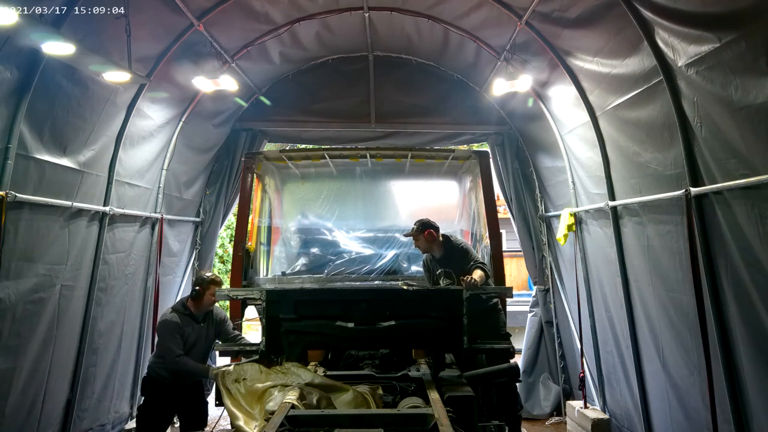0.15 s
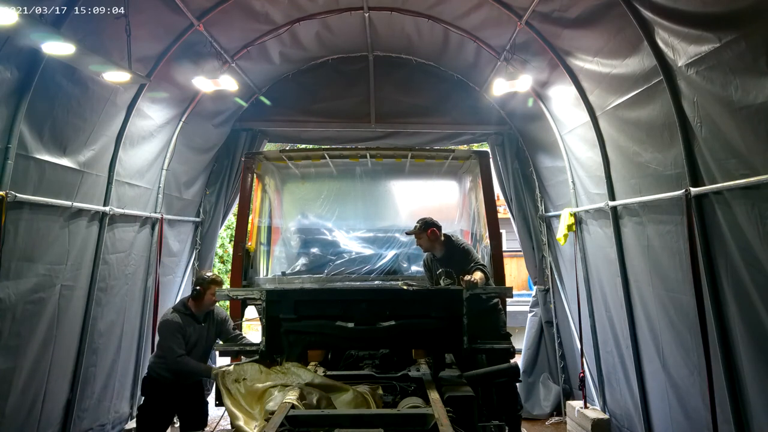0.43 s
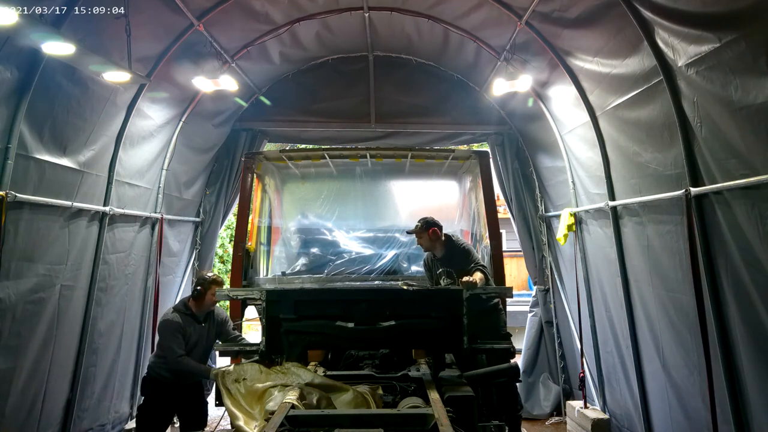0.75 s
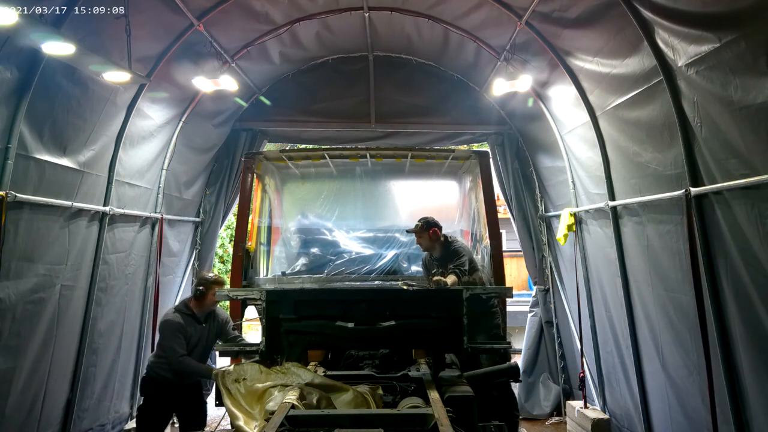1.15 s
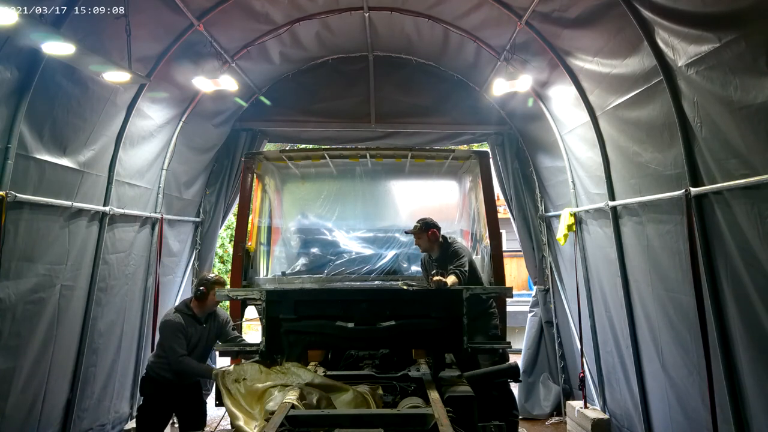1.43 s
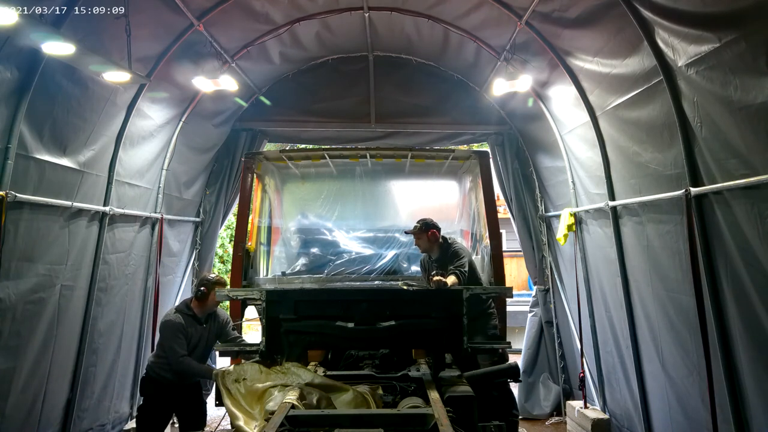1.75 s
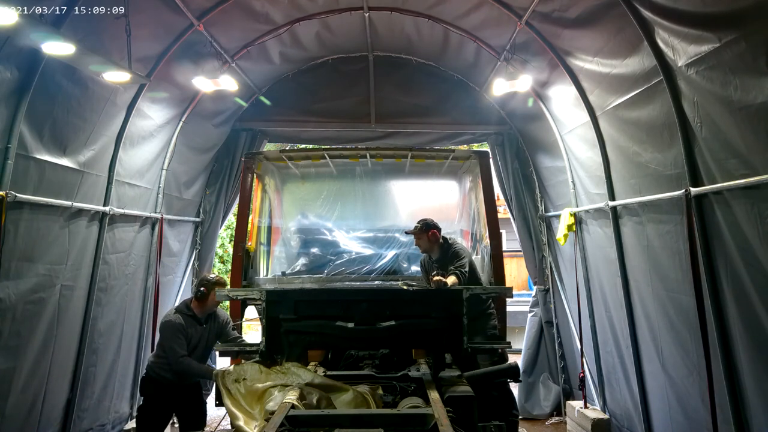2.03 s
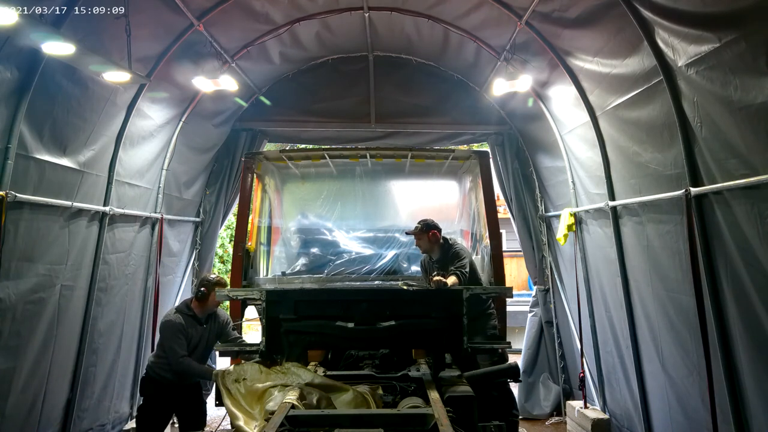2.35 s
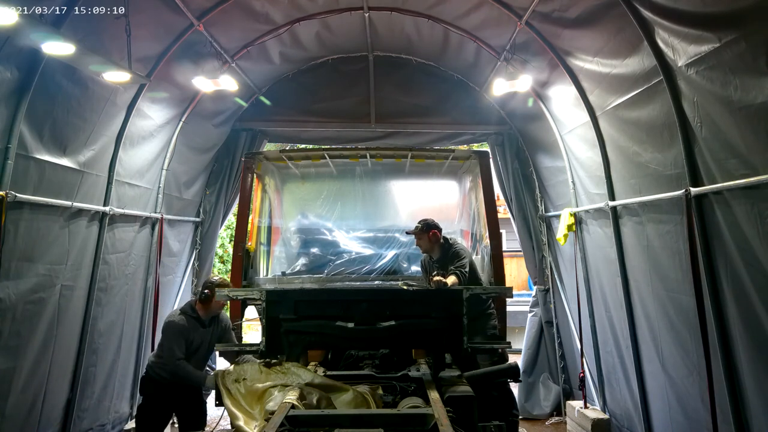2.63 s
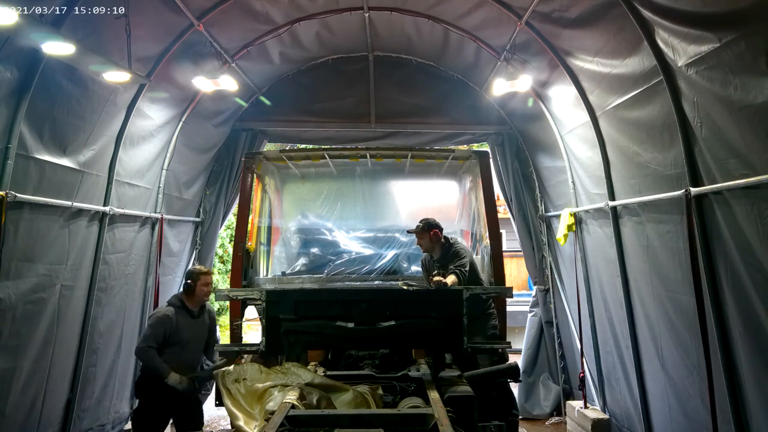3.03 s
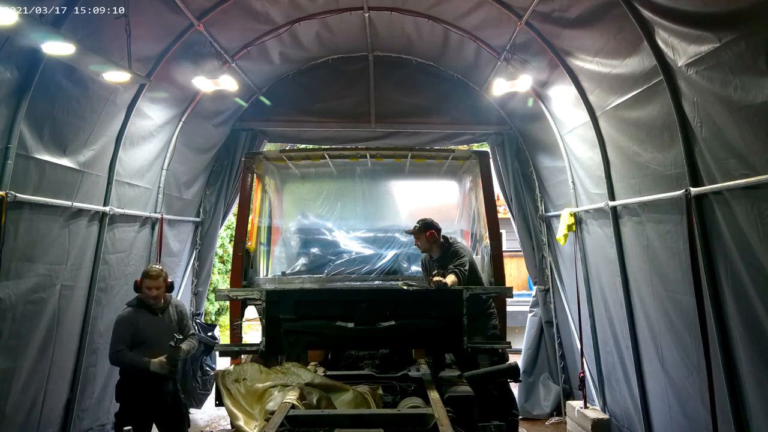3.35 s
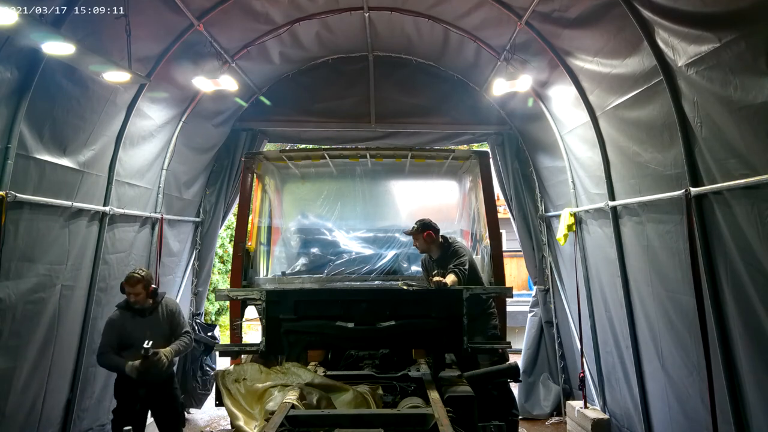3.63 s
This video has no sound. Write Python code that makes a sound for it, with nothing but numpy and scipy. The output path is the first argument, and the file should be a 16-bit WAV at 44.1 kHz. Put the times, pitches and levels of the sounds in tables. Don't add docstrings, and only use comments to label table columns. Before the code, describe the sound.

Inside a fabric shelter, a power saw chatters loudly through a vehicle frame in two cuts, then is switched off, its whine falling as loose parts clink softly, heard from a few metres away.

```python
import sys
import numpy as np
from scipy import signal
from scipy.fft import rfft, irfft, next_fast_len
from scipy.io import wavfile
from scipy.ndimage import uniform_filter1d, minimum_filter1d, map_coordinates

SR = 44100
rng = np.random.default_rng(int(sys.argv[2]) if len(sys.argv) > 2 else 0)


def to_wav(s):
    ch = np.atleast_2d(s).T
    pcm = np.round(np.clip(ch, -1, 1) * 32767)
    wavfile.write(sys.argv[1], SR, pcm.astype(np.int16))


def gain_from_db(level_db):
    decades = np.asarray(level_db, float) / 20
    return 10 ** decades


N = 167580
T = np.arange(N) / SR
CUT_END_S = 2.53
TOP_HZ = 15720

# frequency in Hz, level in dB per Hz.
RUMBLE = [(12, -32), (20, -9.5), (27, -19), (91, -10.5), (108, -19), (200, -22), (260, -34), (440, -120)]
# frequency in Hz, width in Hz, level in dB.
CHASSIS = [(152.5, 8.6, -6), (222.8, 13.4, 0), (265, 32, -7), (357, 58, -7.5), (388, 48, -5.5),
           (745, 90, -10.5)]


def unit(x):
    return x / np.sqrt(np.mean(x ** 2) + 1e-20)


def along(points, hz):
    f, v = np.transpose(points)
    return np.interp(np.log(hz + 1), np.log(f + 1), v)


def curves(rows):
    s, *cols = np.transpose(rows)
    return [np.interp(T, s, c) for c in cols]


def wobble(rate):
    return map_coordinates(rng.standard_normal(int(N * rate / SR) + 4), [T * rate])


def filtered(x, response):
    m = next_fast_len(N + SR // 2)
    return irfft(rfft(x, m) * response(np.fft.rfftfreq(m, 1 / SR)), m)[..., :N]


def ringing(x, modes):
    def response(f):
        total = 0
        for k, (centre, width, db) in enumerate(modes):
            damping = 1j * f * width
            total = total + (-1) ** k * gain_from_db(db) * damping / (centre * centre - f * f + damping)
        return total
    return filtered(x, response)


def noise(spectrum):
    return unit(filtered(rng.standard_normal(N), lambda hz: gain_from_db(along(spectrum, hz))))


def evened(x, share, size):
    power = np.abs(uniform_filter1d(x ** 2, size=size)) + 1e-9
    return unit(x * power ** (-np.clip(share, 0, 1) / 2))


def tone(hz, jitter_hz):
    return 2 * np.pi * np.cumsum(hz + jitter_hz * wobble(120)) / SR


def teeth(chatter_db):
    return unit(rng.standard_normal(N) * gain_from_db(chatter_db * (wobble(44.99) + 0.49 * wobble(15.0))))


def panel_boom(boom_db):
    # frequency in Hz, width in Hz, level in dB.
    panel = [(347, 17.6, -18), (389.3, 4.6, -13.5), (476.1, 20.9, -0.5), (528.6, 25.2, 0.5), (565, 32.2, 0),
             (609.3, 30, -5.5), (654.6, 27.4, -9), (694.4, 43, -11), (796, 19, -13)]
    # frequency in Hz, width in Hz, level in dB.
    body = [(526, 370, 0)]
    # peak in seconds, level in dB.
    blows = [(0.105, -5), (0.154, -4), (0.206, -4.5), (0.254, -0.5), (0.298, -9.5), (0.323, -13),
             (0.401, -6.5), (0.45, -20), (0.497, -9), (0.538, -4), (0.599, -8.1), (0.624, -1.5),
             (0.672, -7), (0.72, 0), (0.774, -9), (0.813, -15.5), (0.847, -8.5), (0.892, -11),
             (0.922, -12.5), (0.961, -3), (1.004, -3), (1.044, -8.5), (1.089, -14), (1.108, -13.5),
             (1.201, -7.5), (1.227, -10), (1.253, -1), (1.294, -14), (1.335, -10), (1.376, -14),
             (1.446, -12), (1.466, -11), (1.499, -7.5), (1.551, -2.5), (1.609, -9.5), (1.64, -7),
             (1.669, -13), (1.706, -4), (1.729, -11), (1.772, -6.5), (1.811, -9.5), (1.839, -14.5),
             (1.862, -10.5), (1.906, -7.5), (1.97, -11), (2.025, -10.4), (2.061, -11), (2.099, -17),
             (2.212, -15), (2.236, -8.5), (2.277, -9.3), (2.316, -25), (2.337, -15), (2.374, -12.9),
             (2.433, -5.5), (2.457, -5), (2.478, -7.3), (2.51, -6)]
    rise_s, fall_s, blow_db, bed_db = 0.0065, 0.0067, -4.5, -2.5
    boom = evened(ringing(teeth(chatter_db=1.5), panel), 0.66, size=220)
    caught = np.zeros(N)
    for s, db in blows:
        caught[round(s * SR)] = gain_from_db(2 * (db + blow_db))
    lag = np.arange(-2000, 2001) / SR
    swell = np.exp(-(lag / np.where(lag < 0, rise_s, fall_s)) ** 2)
    caught = signal.fftconvolve(caught, swell, "same")
    level = np.sqrt(gain_from_db(2 * (boom_db + bed_db)) + np.abs(caught))
    return gain_from_db(0.87) * ringing(level * boom, body)


def blade_squeal():
    # time in seconds, pitch in Hz, level in dB.
    course = [
        (.85, 6450, -48),
        (1.0, 6700, -39),
        (1.09, 6830, -34),
        (1.17, 6890, -38),
        (1.22, 6920, -60),
    ]
    hz, db = curves(course)
    sounding = (T > course[0][0]) * (T < course[-1][0])
    return gain_from_db(db + 3 + 4 * wobble(60)) * np.sin(tone(hz, jitter_hz=50)) * sounding


def cutting():
    # time in seconds, panel boom in dB, frame ring in dB, tooth rasp in dB.
    feed = [(0.0, -9.5, -25, -34), (0.03, -19.5, -30.5, -66), (0.14, -17, -24.5, -49),
            (0.42, -18.5, -24, -41.5), (0.62, -13, -23.5, -37), (0.88, -16, -23.5, -38.5),
            (1.0, -11, -24.5, -35.5), (1.16, -23.5, -33, -45.5), (1.24, -20, -23, -33),
            (1.34, -13, -27.5, -37.5), (1.42, -19.5, -26, -34), (1.7, -16.5, -25.5, -35),
            (2.13, -18.5, -30.5, -36), (2.27, -15.5, -26, -37), (2.37, -18.5, -29.5, -34.5),
            (2.49, -18.5, -28.5, -34), (2.66, -63, -39, -33)]
    # frequency in Hz, width in Hz, level in dB.
    first_frame = [(1164, 160, -4), (2474, 36, -3.5), (2655, 57, -1.5), (3286, 72, -7.5), (3550, 29, -9),
                   (3790, 48, -9.5), (4380, 45, -18), (5130, 240, -16.5), (6030, 130, -15.5),
                   (6770, 110, -15)]
    braces = [(1505, 39, -6.5), (2880, 54, -6.5)]
    # frequency in Hz, width in Hz, level in dB.
    second_frame = [(1193, 62, -1.5), (2150, 86, -7.5), (2604, 60, -1.5), (3140, 180, -6.5),
                    (3510, 160, -8), (3980, 48, -8), (4350, 78, -12), (5000, 120, -10), (5750, 97, -10.5),
                    (6300, 41, -9), (6800, 120, -11.5), (7950, 120, -15.5)]
    # frequency in Hz, level in dB per Hz.
    rasp_colour = [(530, -17), (900, -2.5), (1190, 2.5), (1890, -3.5), (2110, -1.5), (2320, -8), (3130, -7),
                   (8350, -15.5), (15800, -14)]
    # time in seconds, level in dB.
    sing_course = [
        (0.0, -36),
        (0.062, -51),
        (0.21, -29.5),
        (0.748, -31),
        (0.774, -25),
        (0.972, -29),
        (0.998, -25),
        (1.186, -42),
        (1.2, -37),
    ]
    # frequency in Hz, width in Hz, level in dB.
    brace_pair = [(2047, 18, -5), (2143, 20, 0)]
    boom_db, ring_db, rasp_db = curves(feed)
    second = np.clip((T - 1.18) / 0.0098, 0, 1)
    first = 1 - second
    bite = teeth(chatter_db=0.8)

    frame = first * unit(ringing(bite, sorted(first_frame + braces)))
    frame = frame + second * unit(ringing(bite, second_frame))
    frame = gain_from_db(1.5 + ring_db) * frame
    grit_db = 0.5 * wobble(18) + 2.1 * wobble(60)
    rasp = noise(rasp_colour) * gain_from_db(11.5 + rasp_db + grit_db)
    shake = gain_from_db(-37 + 0.45 * (rasp_db + 33.5)) * noise(RUMBLE)
    sing = first * gain_from_db(curves(sing_course)[0] + 2.5) * evened(ringing(bite, brace_pair), 0.65, size=2500)
    judder = second * gain_from_db(-37 + 1.2 * wobble(11.2)) * unit(ringing(bite, CHASSIS[1:]))

    release = gain_from_db(-120 * np.clip(T - CUT_END_S, 0, None))
    return release * (panel_boom(boom_db) + sing + judder + frame + rasp + shake) + blade_squeal()


def motor():
    # time in seconds, pitch in Hz, level in dB.
    whine_course = [
        (1.12, 9810, -40),
        (1.24, 9865, -28.5),
        (1.42, 9990, -31),
        (1.5, 9960, -29),
        (1.66, 10070, -31),
        (2.07, 10120, -33),
        (2.5, 9935, -29),
        (2.715, 10540, -30),
    ]
    # frequency in Hz, level in dB per Hz.
    fast_air = [(88, -28), (150, -4.5), (634, -0.5), (1010, -21), (1250, -0.5), (2340, 0), (3130, -2.5),
                (5510, -3.5), (15800, -12.5)]
    # frequency in Hz, level in dB per Hz.
    slow_air = [(88, -42), (150, -15), (672, -1.5), (866, -8.5), (1490, 0), (1750, -4), (5720, -15),
                (8450, -19), (15800, -24)]
    # frequency in Hz, width in Hz, level in dB.
    housing = [(635, 55, -2), (1400, 500, -2), (2145, 130, -1), (2660, 70, -3), (3140, 150, -1),
               (3860, 70, -4), (4300, 190, -5)]
    fast_hz, slow_hz = 7550, 5330
    coast = np.clip(T - 2.715, 0, None)
    hz, whine_db = curves(whine_course)
    hz = np.where(coast > 0, 10520 * np.exp(-0.665 * coast), hz)
    hz = uniform_filter1d(hz, size=2000)
    whine_db = np.where(coast > 0, -25.5 - 15.5 * coast, whine_db)
    whine_db = uniform_filter1d(whine_db, size=2000)

    phase = tone(hz, jitter_hz=25.9)
    flutter = np.abs(1 + np.where(T < CUT_END_S, 0.55, 0.45) * wobble(45))
    on = np.clip((T - 1.1) / 0.02, 0, 1)
    overtone = (2 * hz < TOP_HZ) * gain_from_db(-14 - 18 * np.clip(coast - 0.55, 0, 1)) * np.sin(2 * phase)
    whine = on * gain_from_db(whine_db) * flutter * (np.sin(phase) + overtone)

    fast = np.clip((hz - slow_hz) / (fast_hz - slow_hz), 0, 1)
    air = np.sqrt(fast) * noise(fast_air) + np.sqrt(1 - fast) * noise(slow_air)
    air = air + gain_from_db(-1.5) * unit(ringing(rng.standard_normal(N), housing))
    free_db = -33.5 - 6.5 * coast - 4 * coast ** 2
    air_db = uniform_filter1d(np.where(T < CUT_END_S, -33.5, free_db) + 6.5, size=4000)
    return whine, gain_from_db(air_db + 0.61 * wobble(7.38) + 1.2 * wobble(50)) * air


def knocks():
    # start in seconds, peak in dB.
    snags = [(0.543, -22), (1.187, -12), (1.319, -16), (1.485, -16), (1.635, -17.5), (1.67, -17),
             (1.773, -13.5), (1.809, -28), (1.919, -18), (2.032, -15.5), (2.069, -28), (2.158, -15.5),
             (2.19, -25), (2.263, -9.5), (2.413, -18.5), (2.501, -20.5)]
    shove_s = 0.02
    s, db = np.transpose(snags)[:, :, None]
    shove = np.exp(-0.5 * ((T - s - shove_s) / shove_s) ** 2) * rng.standard_normal(N)
    rung = ringing(shove, CHASSIS)
    return np.sum(gain_from_db(db + 1.14) * rung / np.abs(rung).max(axis=1, keepdims=True), axis=0)


def clinks():
    # peak in seconds, pitch in Hz, peak in dB.
    parts = [
        (2.7, 728, -29.5),
        (3.09, 635, -34),
    ]
    total = np.zeros(N)
    for s, hz, db in parts:
        swell = np.exp(-0.5 * ((T - s) / 0.013) ** 2)
        total += gain_from_db(db) * swell * np.sin(2 * np.pi * hz * T)
    return total


def shelter(x):
    # frequency in Hz, time to fall 60 dB in seconds.
    decay = [(200, 0.48), (2000, 0.34), (10000, 0.52)]
    hz, t, z = signal.stft(rng.standard_normal(SR // 2), SR, nperseg=256)
    tail = signal.istft(z * gain_from_db(-60 * t / along(decay, hz)[:, None]), SR, nperseg=256)[1]
    return signal.fftconvolve(np.pad(x, (400, 0)), tail / np.linalg.norm(tail))[:N]


def scene():
    whine, air = motor()
    knock = knocks()
    saw = cutting() + air + clinks()
    echo = shelter(gain_from_db(-5) * saw + whine + gain_from_db(-8) * knock)
    mono = (saw + whine + knock + echo) * gain_from_db(-0.88) + gain_from_db(-47.5) * noise(RUMBLE)
    return np.array([mono, mono])


def microphone(x):
    # frequency in Hz, width in Hz, depth as a share (negative lifts).
    notches = [(1016, 37, 0.51), (1826, 166, 0.56), (5420, 144, 0.31), (8160, 520, 0.17),
               (14100, 400, -0.067), (15200, 1000, -0.92)]

    def response(f):
        gain = f < TOP_HZ
        for centre, width, depth in notches:
            gain = gain * (1 - np.clip(depth, -2, 0.95) * np.exp(-0.5 * ((f - centre) / width) ** 2))
        return gain
    return filtered(x, response)


def limiter(x):
    need = minimum_filter1d(np.minimum(1, 0.84 / (np.abs(x[0]) + 1e-9)), size=600)
    return x * uniform_filter1d(need, size=300)


def treble_gaps(x):
    # start in seconds, end in seconds.
    pause = (2.56, 3.48)
    hz, t, z = signal.stft(x, SR, nperseg=512)
    field = uniform_filter1d(rng.standard_normal(z.shape[1:]), size=4, axis=0)
    field = unit(uniform_filter1d(field, size=2, axis=1))
    band = np.exp(-0.5 * ((hz[:, None] - 14200) / 330) ** 2)
    active = (t < pause[0]) | (t > pause[1])
    gaps_db = -26 * band * np.clip(2 * (field + 0.1), 0, 1) * active
    return signal.istft(z * gain_from_db(gaps_db), SR, nperseg=512)[1][:, :N]


def splits(x):
    # centre in seconds, low edge in Hz, high edge in Hz.
    patches = [(.14, 4600, 6400), (.37, 11000, 12500), (.56, 8900, 10500), (.56, 11700, 13900),
               (1.28, 14400, 15700), (1.765, 8900, 10500), (2.09, 4100, 8400), (2.09, 14400, 15700),
               (2.37, 6200, 7700), (2.37, 11000, 12500), (2.6, 4100, 6400)]
    other = np.roll(x[0], 3000)
    side = np.zeros(N)
    for s, low, high in patches:
        swell = np.cos(np.clip((T - s) / 0.02, -1, 1) * np.pi / 2)
        side += swell * filtered(other, lambda f: (f > low) & (f < high))
    return gain_from_db(-3) * np.array([side, -side])


def low_pass(x):
    return signal.sosfilt(signal.butter(12, 15910, fs=SR, output="sos"), x)


def record(dry):
    x = treble_gaps(limiter(microphone(dry)))
    mix = x + splits(x) + 0.0135
    return low_pass(mix)


dry = scene()
out = record(dry)
to_wav(out)
```